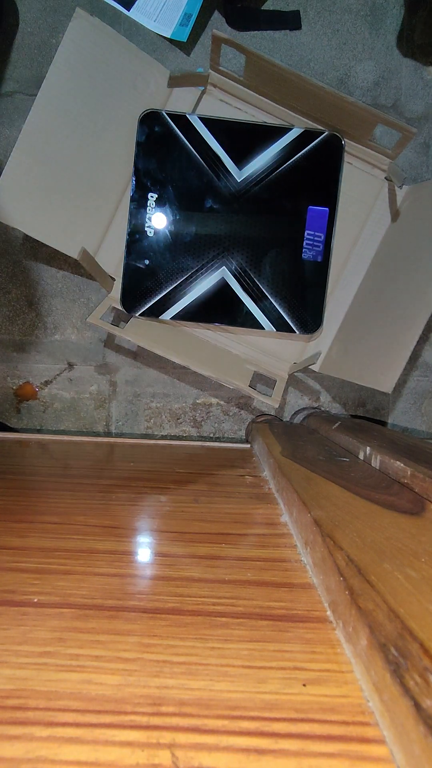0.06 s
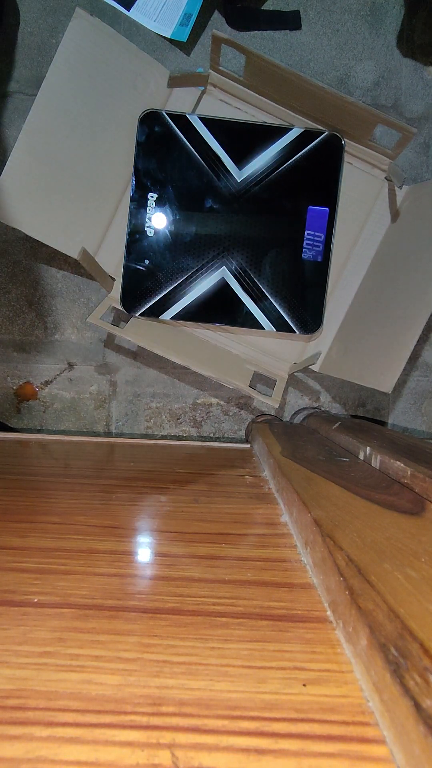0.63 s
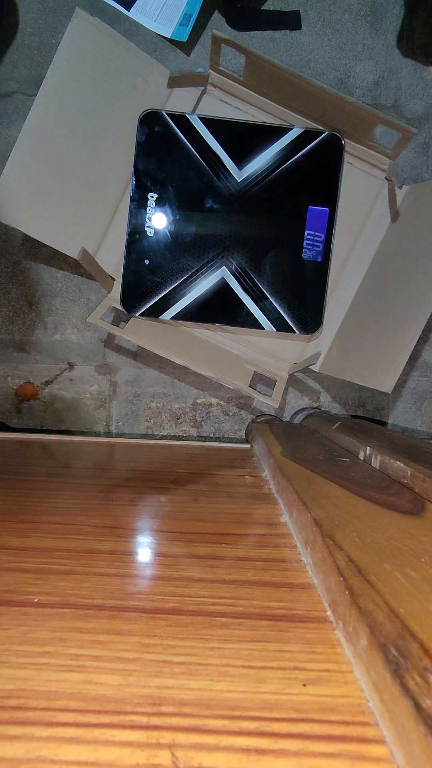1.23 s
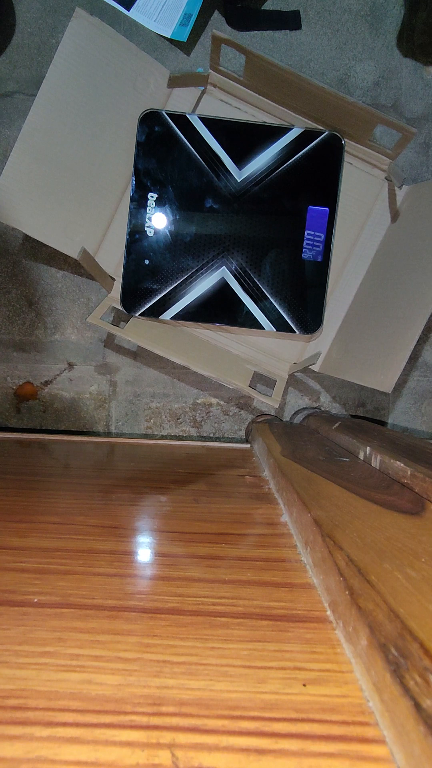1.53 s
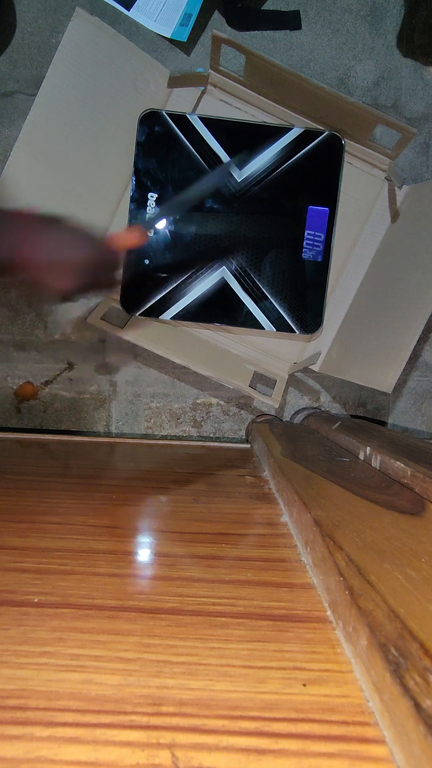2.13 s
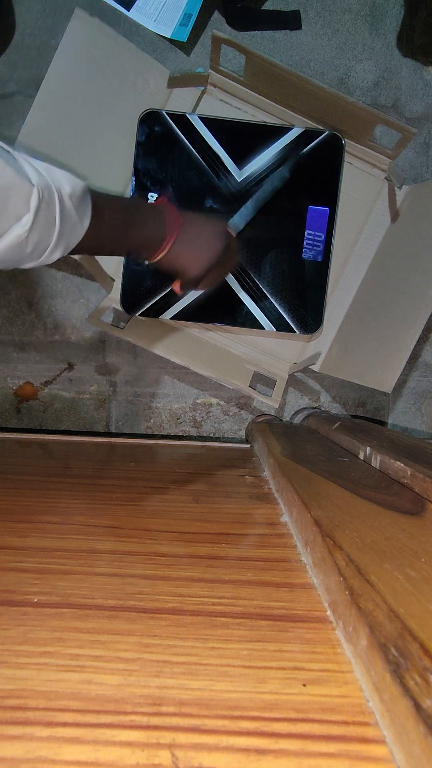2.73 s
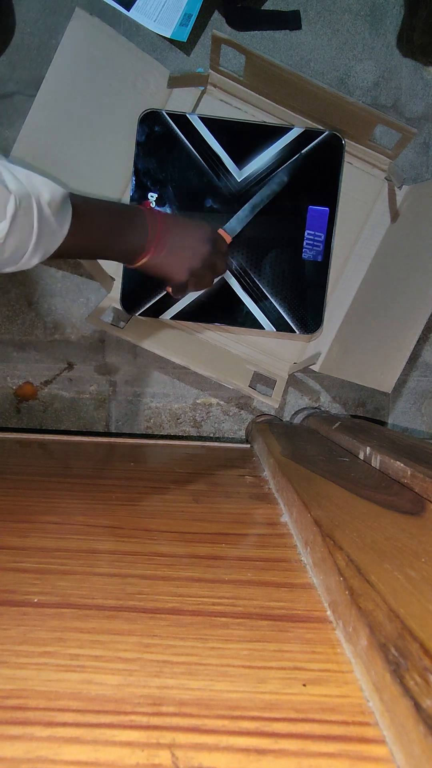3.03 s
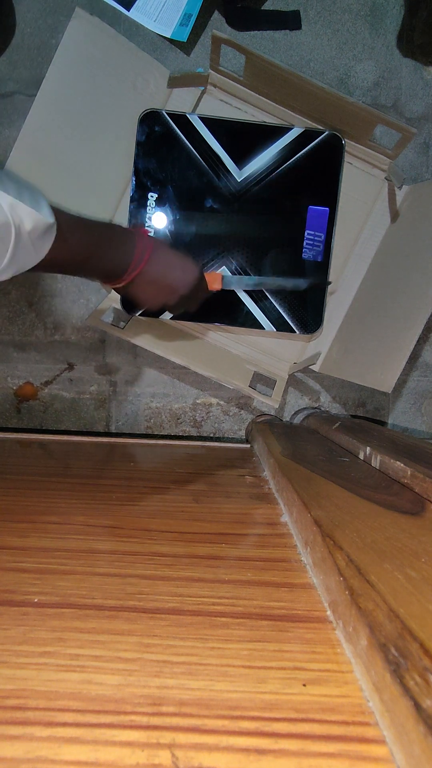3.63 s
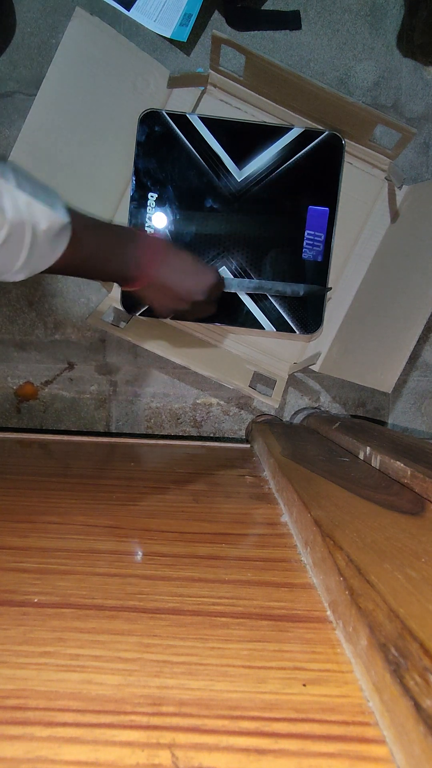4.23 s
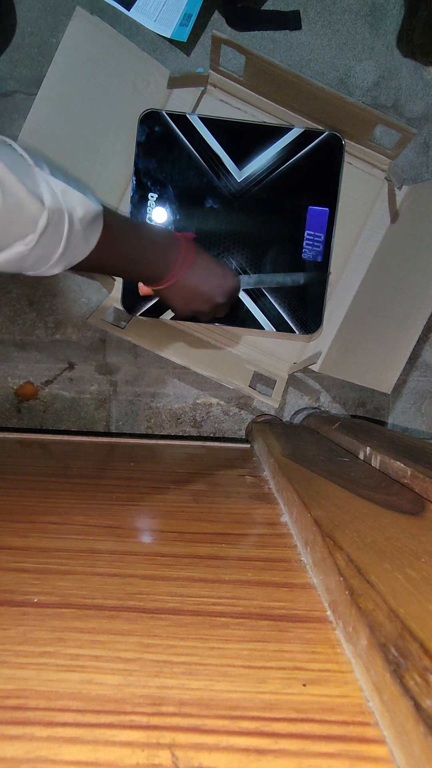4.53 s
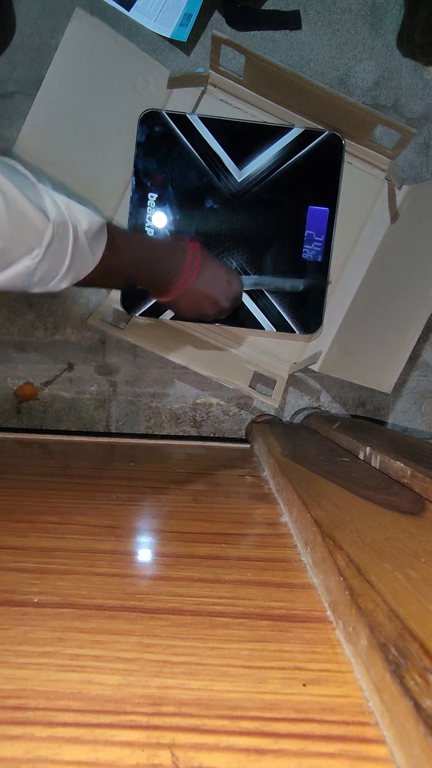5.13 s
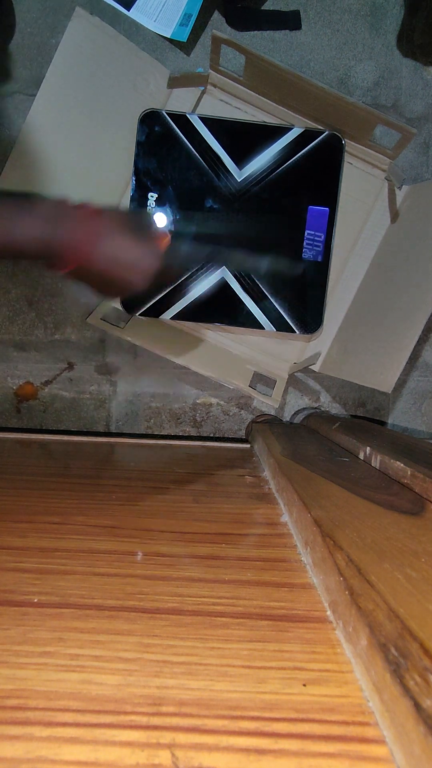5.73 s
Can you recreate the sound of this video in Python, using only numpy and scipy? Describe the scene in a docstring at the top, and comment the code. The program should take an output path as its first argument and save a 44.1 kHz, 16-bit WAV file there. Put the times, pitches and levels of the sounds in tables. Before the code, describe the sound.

A steady low rumble and hiss fills a small quiet room; all the action is off to the left. A sleeve swishes faintly from about 1.2 seconds, with tiny dry snaps and two faint squeaks between 1.4 and 1.7. At 2.2 a steel knife clatters onto a glass-topped scale in several quick knocks, and the cardboard box beneath gives a soft boom. Each touch thumps, rings glass and blade briefly and bounces. More taps start at 2.8, with a loud knock at 2.9, then lighter rocking until 3.3. At 3.7 comes a sharp, bright clink with the clearest blade ring. Soft taps follow around 4.5 to 4.6 and 5.1 to 5.2. The sleeve swishes again, and at 5.6 the knife knocks once more as it lifts, with a dull cardboard bump and a last faint rustle.

```python
"""A small quiet room: off to the left, a steel knife is set down on a glass-topped bathroom scale
that lies in its open carton. The knife lands twice, rocks, is tapped down again and lifted off.
Each touch thumps the scale, rings glass and blade and bounces twice; hard ones add a housing clack
and an edge tick, and the cardboard gives with a few soft booms. A sleeve swishes as the arm moves,
faint snaps and squeaks come before the knife, and a bed of low rumble and hiss lies under it all."""
import sys
import numpy as np
from scipy import signal
from scipy.fft import rfft, irfft
from scipy.io import wavfile

SR = 44100
rng = np.random.default_rng(int(sys.argv[2]) if len(sys.argv) > 2 else 0)


def digitize_waveform(pressure):
    """Quantize a signal to 16-bit integers and store it at the path in sys.argv[1].

    Rows of a 2-D input are taken as channels; values are limited to [-1, 1].
    """
    field = np.atleast_2d(pressure).T
    bounded = np.clip(field, -1, 1)
    quanta = np.round(bounded * 32767).astype(np.int16)
    wavfile.write(sys.argv[1], SR, quanta)


N = 259308
TIME = np.arange(N) / SR
RING_TIME = TIME[:int(.35 * SR)]

# colour of the room tone and of the cloth: (frequency [Hz], relative level [dB])
AIR_SPECTRUM = [(15, -2.5), (25, -6), (48, -14.5), (95, -14), (170, -18.5), (280, -23.5), (650, -29),
                (1500, -38), (4400, -45), (5400, -52.5), (7600, -56), (10000, -52), (12000, -47.5),
                (13200, -51), (16000, -52)]
SLEEVE_SPECTRUM = [(200, 1), (600, 6), (1300, -3.5), (2400, -1), (4200, -2), (5200, -7.5), (7500, -14.5),
                   (10000, -11), (16000, -23.5)]
# stereo image of the room tone: (frequency [Hz], left-right correlation [-1..1])
AIR_CORRELATION = [(60, 0.1), (180, 0.027), (550, 0.024), (1650, -0.04), (4970, 0.0036), (15000, -0.048)]
# arm moves: (time of top speed [s], level [dB], half-length [s])
SLEEVE_SWISHES = [(1.284, -57.5, 0.21), (1.806, -63, 0.24), (2.382, -60, 0.2), (3.504, -63.5, 0.079),
                  (4.345, -62, 0.083), (5.338, -56.5, 0.12), (5.87, -55, 0.13)]
# dry snaps: (time [s], level [dB])
SNAP_CUES = [(1.377, -60), (1.6668, -44), (1.6714, -42.5)]
# faint squeaks: (time [s], final pitch [Hz], level [dB])
SQUEAK_CUES = [(1.567, 2820, -59), (1.671, 2800, -52.5)]
# knife on glass: (time [s], glass [dB], thump [dB], blade [dB], hardness [0..1], loss per bounce [dB])
KNIFE_TOUCHES = [ (2.167, -22.5, -19, -36.5, 0.52, 8), (2.2212, -27.5, -18, -63, 0.98, 11),
                 (2.242, -29, -36, -58, 0.95, 13), (2.252, -23, -28, -60, 0, 7.5),
                 (2.355, -44.5, -52.5, -73, 0, 27), (2.807, -33, -46, -42, 0.86, 14),
                 (2.8303, -41, -44, -44.5, 0.89, 10), (2.899, -43, -54, -55, 0.3, -6),
                 (2.923, -17, -30.5, -33, 0.32, 13), (2.9912, -34, -44, -54, 0.07, 6),
                 (3.048, -37, -43, -66, 0.1, 27), (3.094, -33, -36, -62, 0.37, 10),
                 (3.204, -39.5, -46.5, -53, 0.68, 7.5), (3.2924, -47, -47, -68, .25, 16),
                 (3.69, -22.5, -29, -17, 0.86, 6), (3.7277, -37, -39, -32.5, 1, 22),
                 (3.8127, -38, -49.5, -70, 0, 5.5), (4.5137, -50, -50, -79, 0, 15),
                 (4.631, -49.5, -41.5, -66, 0.04, 15), (5.0667, -38.5, -40.5, -43.5, 0.72, 12),
                 (5.199, -52.5, -49.5, -72, 0.5, 23), (5.5927, -28.5, -29.5, -49, 0.26, 8),
                 (5.6338, -44.5, -42, -74, 0.77, 20), ]
# where the knife lies and how it is held decide which modes it favours and how much it damps them:
# (start [s], scale focus [Hz], glass focus [Hz], blade focus [Hz], share of free ring time [0..1])
KNIFE_POSES = [(2.0, 345, 870, 1700, 0.93), (2.2, 383, 880, 4300, 0.68), (2.6, 230, 1110, 2090, 0.88),
               (2.87, 421, 830, 1900, 0.95), (2.96, 385, 1110, 2150, 0.73), (3.5, 273, 860, 2240, 0.91),
               (3.76, 293, 1120, 2300, 0.66), (4.3, 208, 1050, 2200, .9), (4.9, 377, 760, 4400, 0.81),
               (5.4, 310, 980, 1500, 0.77)]
# ringing modes of each part: (frequency [Hz], relative level [dB], t60 [s])
SCALE_RESONANCES = [(198.5, -0.5, 0.17), (260, -12.5, 0.42), (288.3, 4.5, 0.1), (321, -28, 0.11),
                    (348, 0, 0.13), (426.5, -2, 0.18), (494.3, 0, 0.12)]
GLASS_RESONANCES = [(420, -4, .1), (565, -9, .08), (632, -3, .12), (715, -6, .07), (781, -4, .11),
                    (826, -4, .09), (905, -7, .08), (990, -6, .09), (1055, -4, .06), (1130, 2, .09),
                    (1166, 0, .11), (1250, -3, .055), (1375, -9, .07), (2015, -13, .09), (2285, -8, .11)]
BLADE_RESONANCES = [(1510, -13, .11), (1620, -14, .11), (2020, -10, .09), (2183, 0, .11), (2469, -1, .115),
                    (2542, -12, .11), (2859, -8, .12), (3187, -14, .1), (3655, -11, .11), (3990, -13, .17),
                    (4517, -12, .11), (5585, -17, .2), (6200, -19, .08), (6700, -18, .09), (7596, -23, .18)]
EDGE_RESONANCES = [(4350, 0, .03), (5800, -7, .03), (9900, -4, .08), (10560, -12, .08), (12600, -11, .06)]
# crowded, quickly damped modes, played as noise: (frequency [Hz], relative level [dB])
SNAP_SPECTRUM = [(800, -14), (2300, -24), (2900, -14), (4600, -5), (6300, -6), (7800, -17), (9400, -4),
                 (11500, -21), (16000, -13)]
SCALE_SPECTRUM = [(60, -44), (150, -8), (220, -30), (340, 23.5), (500, -17.5), (700, -24), (1500, -63)]
GLASS_SPECTRUM = [(200, -55), (400, -40), (650, 20.5), (1180, -4), (1450, -8), (2000, -68), (5000, -98)]
HOUSING_SPECTRUM = [(500, -18), (1100, 7.5), (1900, 9), (2500, -2.5), (2900, 3), (3350, -3.5), (4200, 2),
                    (5000, -14), (5900, -3), (7500, -14.5), (16000, -17)]
EDGE_SPECTRUM = [(1500, -45), (3300, 7.5), (4300, 8.5), (5200, 4.5), (6200, 2), (8000, -2.5), (10000, 5),
                 (12000, 5), (16000, -17)]
CARTON_SPECTRUM = [(30, 4), (70, 3), (120, 1), (200, 9), (290, -1), (420, -56), (900, -33.5)]
# dull bumps of the scale in its carton: (time [s], level [dB])
CARTON_BUMPS = [(2.169, -54), (2.244, -31.5), (4.636, -59), (5.595, -38), (5.62, -40), (5.651, -45)]
# acoustic shadow on the far, right side: (frequency [Hz], gain [dB])
FAR_SHADOW = [(100, -0.5), (200, -7.5), (400, -6), (700, -11.5), (1300, -12), (2400, -20), (4400, -29),
              (8000, -8.5), (11000, -10.5), (16000, -18)]


def from_db(db):
    """Decibels to gain."""
    return 10 ** (np.asarray(db) / 20)


def curve_on_bins(points, size):
    """A curve drawn over log frequency, read at each FFT bin."""
    hz, value = np.transpose(points)
    return np.interp(np.log(np.fft.rfftfreq(size, 1 / SR) + 1e-9), np.log(hz), value)


def noise(spectrum, size):
    """Noise of a given colour, rms 1."""
    x = irfft(rfft(rng.standard_normal(size)) * from_db(curve_on_bins(spectrum, size)), size)
    return x / x.std()


def unit_hit(x):
    """Gives a hit the energy of ten milliseconds at level 1."""
    return x / np.sqrt(np.sum(x ** 2) / (SR / 100))


def attack(rise_s):
    """The force of a contact builds up smoothly."""
    return (1 - np.exp(-RING_TIME / rise_s)) ** 2


def decay(t60):
    """A fade that drops 60 dB in t60 seconds."""
    return from_db(-60 * RING_TIME / t60)


def wash(spectrum, rise_s, crack_t60, tail_db, tail_t60):
    """Crowded modes struck at once: a quick crack and a weaker, longer tail."""
    fade = decay(crack_t60) + from_db(tail_db) * decay(tail_t60)
    return unit_hit(noise(spectrum, len(RING_TIME)) * fade * attack(rise_s))


def ring(modes, contact_hz, focus_hz=None, ring_share=1, *, rise_s, focus_db=0):
    """Decaying sines; the contact point lifts modes near the focus, and soft contacts miss high ones."""
    hz, db, t60 = np.transpose(modes)[:, :, None]
    scatter_db = 2 * rng.standard_normal(hz.shape)
    strength = from_db(db + scatter_db) * rng.choice([-1, 1], hz.shape)
    strength /= np.sqrt(1 + (hz / contact_hz) ** 4)
    if focus_hz:
        octaves_away = np.log2(hz / focus_hz)
        strength *= from_db(focus_db * np.exp(-(octaves_away / .4) ** 2))
    sines = strength * np.sin(2 * np.pi * hz * RING_TIME) * decay(t60 * ring_share)
    return unit_hit(sines.sum(axis=0) * attack(rise_s))


def add(track, time_s, sound):
    """Lays a sound into a track at its cue."""
    start = round(time_s * SR)
    track[start:start + len(sound)] += sound[:N - start]


def room_tone():
    """A steady, wide bed of rumble and hiss from the still air."""
    correlation = curve_on_bins(AIR_CORRELATION, N)
    mid, side = rfft(noise(AIR_SPECTRUM, N)), rfft(noise(AIR_SPECTRUM, N))
    side *= np.sqrt((1 - correlation) / (1 + correlation))
    return from_db(-51) * irfft(np.array([mid + side, mid - side]), N)


def sleeve():
    """Cloth hisses with the speed of the arm, a bell curve on every move, and stirs faintly at rest."""
    swishes = sum(from_db(db) * np.exp(-((TIME - peak_s) / half_s) ** 2)
                  for peak_s, db, half_s in SLEEVE_SWISHES)
    return (from_db(-76.5) + swishes) * noise(SLEEVE_SPECTRUM, N)


def snaps():
    """Short bright snaps with hardly any ring."""
    track = np.zeros(N)
    for time_s, db in SNAP_CUES:
        snap = wash(SNAP_SPECTRUM, rise_s=.0001, crack_t60=.007, tail_db=-15.5, tail_t60=.14)
        add(track, time_s, from_db(db) * snap)
    return track


def squeaks():
    """Tiny chirps that slide down onto their pitch."""
    track = np.zeros(N)
    for time_s, final_hz, db in SQUEAK_CUES:
        pitch_hz = final_hz * (1 + .15 * np.exp(-RING_TIME / .0034))
        tone = np.sin(2 * np.pi * np.cumsum(pitch_hz) / SR)
        add(track, time_s, from_db(db) * unit_hit(tone * attack(rise_s=.0034) * decay(t60=.036)))
    return track


def knife_hit(glass_db, thump_db, blade_db, hardness, pose):
    """Steel on glass rings scale, plate and blade; hardness brings up housing clack and edge tick."""
    scale_hz, glass_hz, blade_hz, ring_share = pose
    soft_hz, hard_hz = 2000, 11700
    contact_hz = soft_hz * (hard_hz / soft_hz) ** hardness   # the modes roll off above this
    thump = ring(SCALE_RESONANCES, contact_hz, scale_hz, ring_share, rise_s=.002, focus_db=11)
    thump += from_db(-10) * wash(SCALE_SPECTRUM, rise_s=.00045, crack_t60=.015, tail_db=-19, tail_t60=.29)
    glass = ring(GLASS_RESONANCES, contact_hz, glass_hz, ring_share, rise_s=.00062, focus_db=7)
    glass += from_db(-10) * wash(GLASS_SPECTRUM, rise_s=.0004, crack_t60=.025, tail_db=-18, tail_t60=.29)
    blade = ring(BLADE_RESONANCES, contact_hz, blade_hz, ring_share, rise_s=.00037, focus_db=7)
    clack = wash(HOUSING_SPECTRUM, rise_s=.00093, crack_t60=.01, tail_db=-21.5, tail_t60=.18)
    tick = wash(EDGE_SPECTRUM, rise_s=.00012, crack_t60=.006, tail_db=-14, tail_t60=.12)
    tick += from_db(-8) * ring(EDGE_RESONANCES, contact_hz, rise_s=.0003)
    clack_db = thump_db - 19 + 18 * hardness
    tick_db = glass_db - 59 + 55.5 * hardness
    faders = from_db([thump_db, glass_db, blade_db, clack_db, tick_db])
    return faders @ np.array([thump, glass, blade, clack, tick])


def knife():
    """Each touch is a hit and two quick bounces that lose hardness and, nearly always, level."""
    bounce_s, hardness_kept = .023, .39
    thump_loss_db, blade_loss_db = .5, 3.5   # per bounce, on top of the touch's own loss
    track = np.zeros(N)
    for time_s, glass_db, thump_db, blade_db, hardness, loss_db in KNIFE_TOUCHES:
        pose = [settings for start_s, *settings in KNIFE_POSES if start_s <= time_s][-1]
        for bounce in range(3):
            hit = knife_hit(glass_db, thump_db - bounce * thump_loss_db,
                            blade_db - bounce * blade_loss_db, hardness * hardness_kept ** bounce, pose)
            add(track, time_s + bounce * bounce_s, from_db(-bounce * loss_db) * hit)
    return track


def carton():
    """The cardboard gives under the scale with a soft boom."""
    track = np.zeros(N)
    for time_s, db in CARTON_BUMPS:
        boom = wash(CARTON_SPECTRUM, rise_s=.0099, crack_t60=.25, tail_db=-4, tail_t60=.26)
        add(track, time_s, from_db(db) * boom)
    return track


def reflections(x, predelay_s, t60):
    """Diffuse echoes with about the energy of the sound itself."""
    echoes = rng.standard_normal(len(RING_TIME)) * decay(t60) * (RING_TIME > predelay_s)
    return signal.fftconvolve(x, echoes / np.linalg.norm(echoes))[:N]


def place_left(x):
    """The far side hears the sound later and duller, its treble partly by way of nearby surfaces."""
    far_lag_s = .0004015
    near = x + from_db(-13.5) * reflections(x, predelay_s=.0023, t60=.012)
    treble = signal.sosfilt(signal.butter(1, 2000, "high", fs=SR, output="sos"), x)
    far = x + from_db(-2) * reflections(treble, predelay_s=.001, t60=.05)
    shadow = from_db(curve_on_bins(FAR_SHADOW, 2 * N))
    delay = np.exp(-2j * np.pi * np.fft.rfftfreq(2 * N, 1 / SR) * far_lag_s)
    return np.array([near, irfft(rfft(far, 2 * N) * shadow * delay)[:N]])


def scene():
    """The mix: the action on the left, a faint room tail on each side and the room tone."""
    action = knife() + carton() + snaps() + squeaks() + sleeve()
    room_tail = [from_db(db) * reflections(action, predelay_s=.0017, t60=.36) for db in (-23, -26)]
    return place_left(action) + np.array(room_tail) + room_tone()


def record(dry):
    """A steep high cut at 16 kHz."""
    return signal.sosfilt(signal.ellip(10, .1, 80, 16000, fs=SR, output="sos"), dry)


dry = scene()
out = record(dry)
digitize_waveform(out)
```